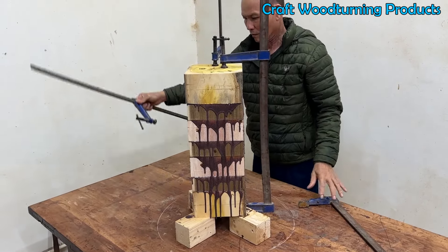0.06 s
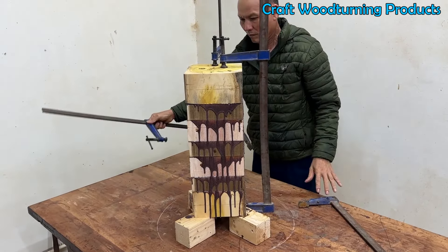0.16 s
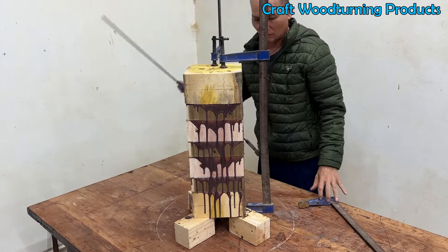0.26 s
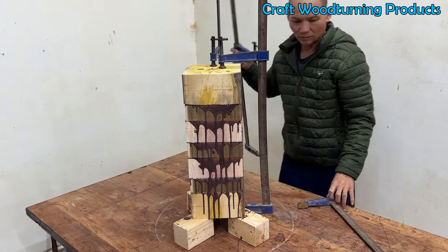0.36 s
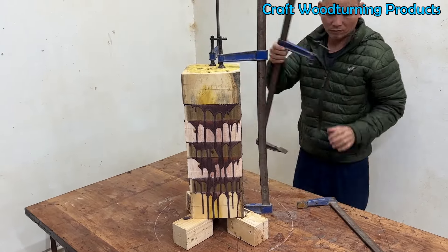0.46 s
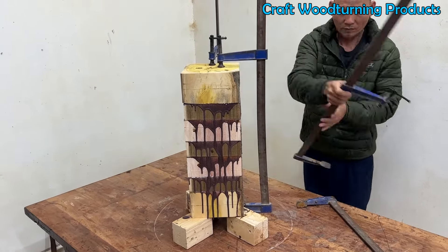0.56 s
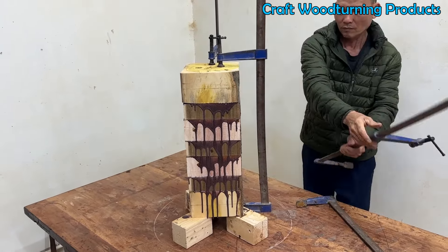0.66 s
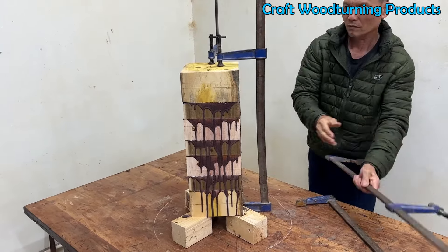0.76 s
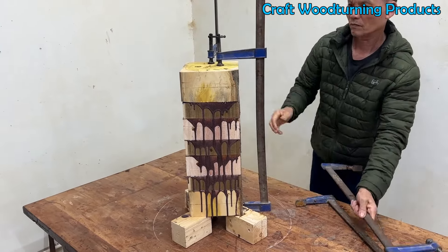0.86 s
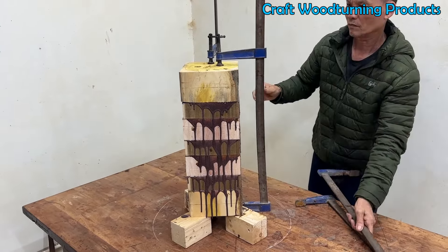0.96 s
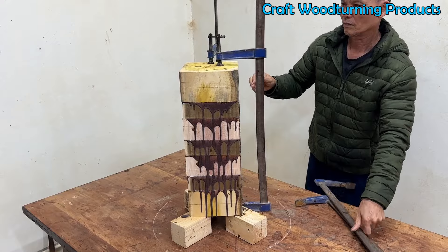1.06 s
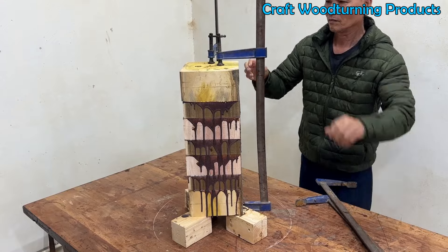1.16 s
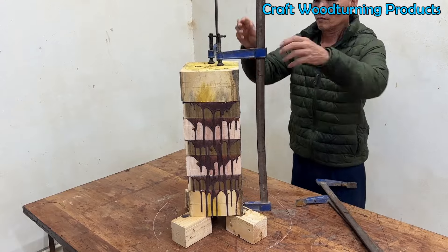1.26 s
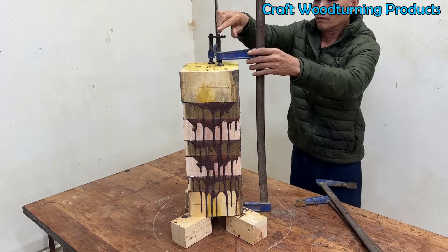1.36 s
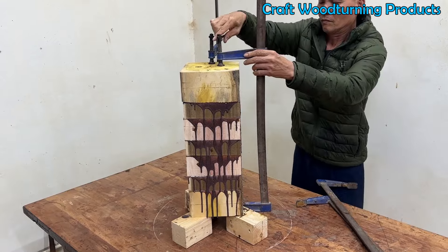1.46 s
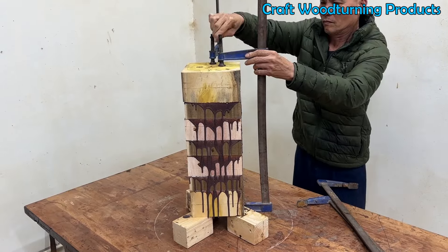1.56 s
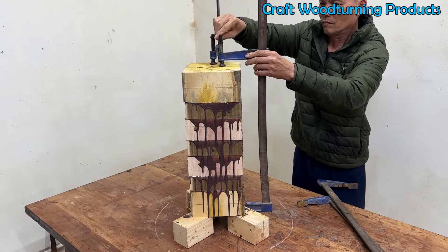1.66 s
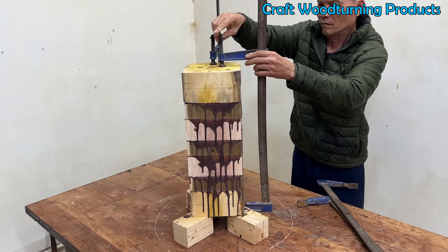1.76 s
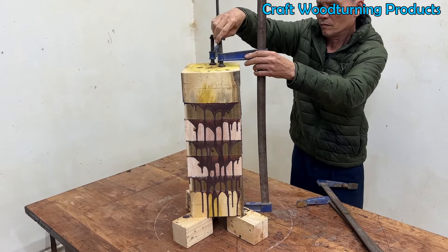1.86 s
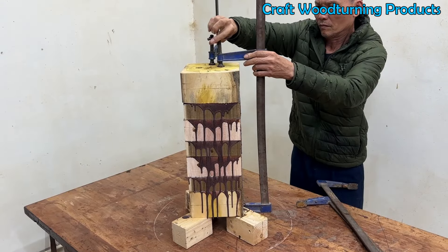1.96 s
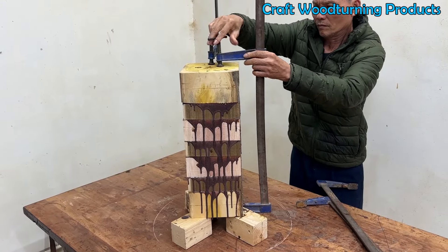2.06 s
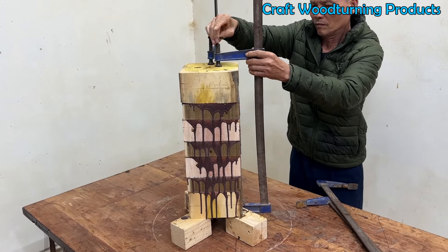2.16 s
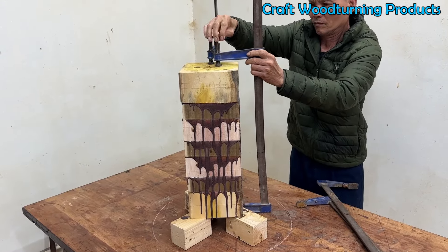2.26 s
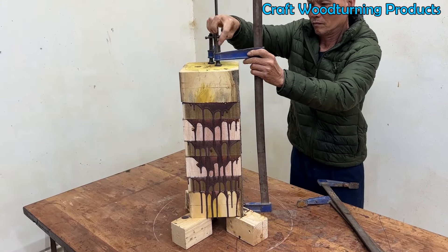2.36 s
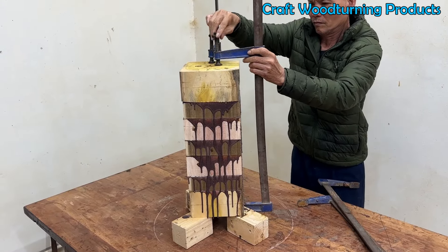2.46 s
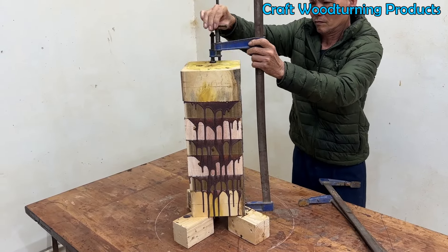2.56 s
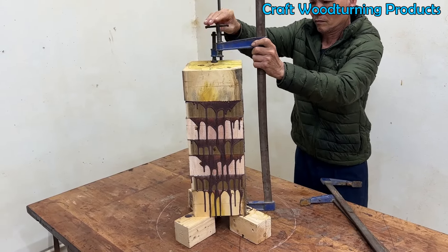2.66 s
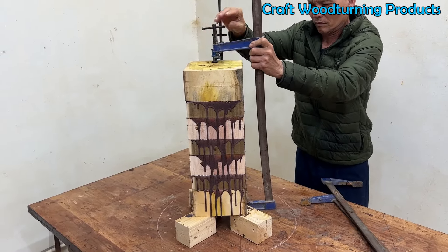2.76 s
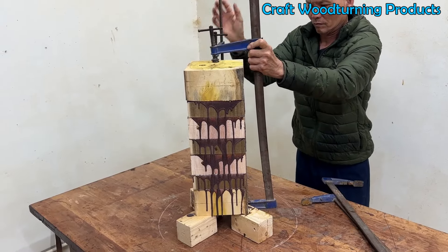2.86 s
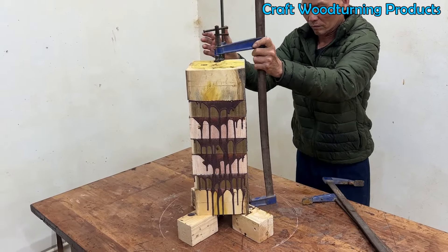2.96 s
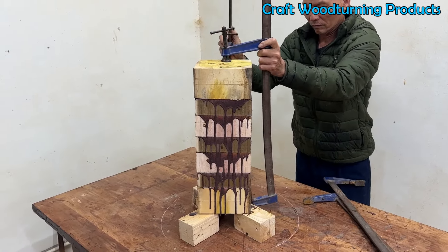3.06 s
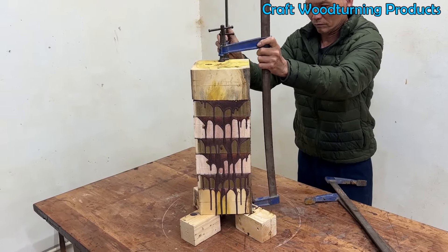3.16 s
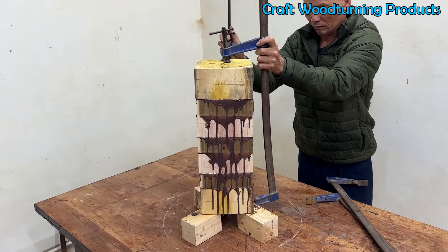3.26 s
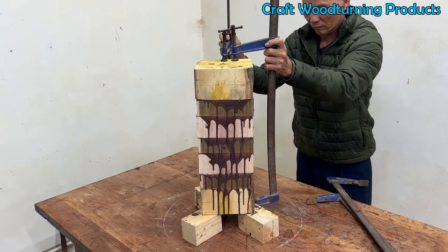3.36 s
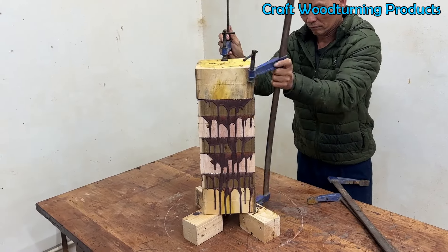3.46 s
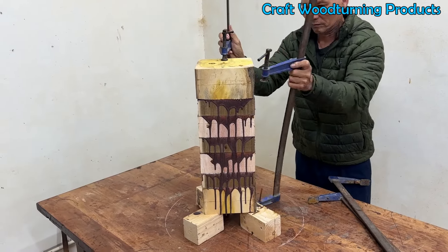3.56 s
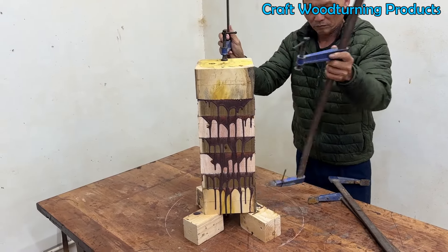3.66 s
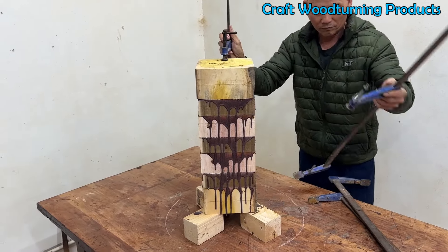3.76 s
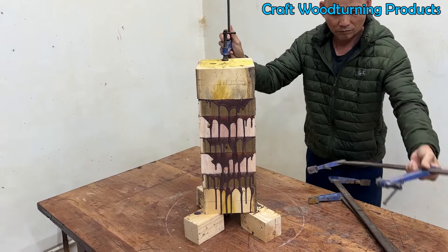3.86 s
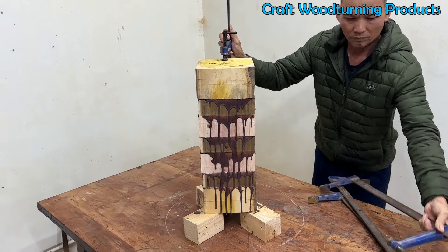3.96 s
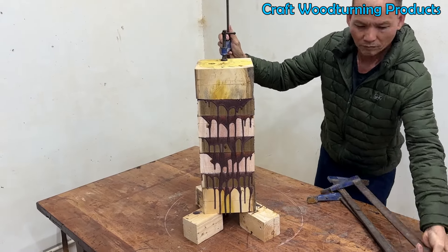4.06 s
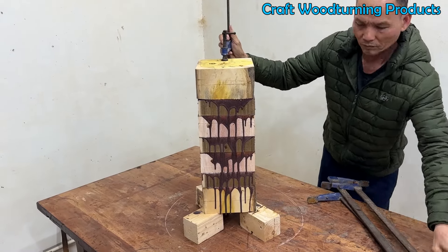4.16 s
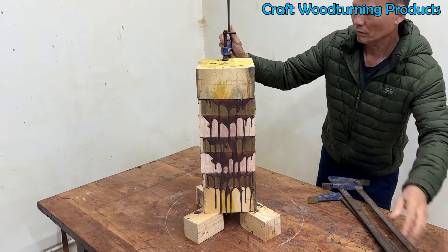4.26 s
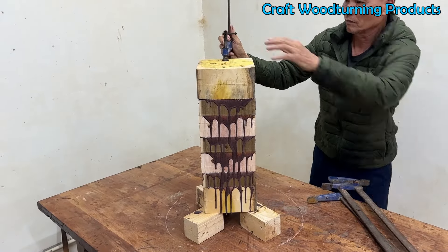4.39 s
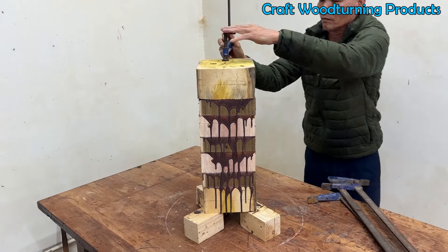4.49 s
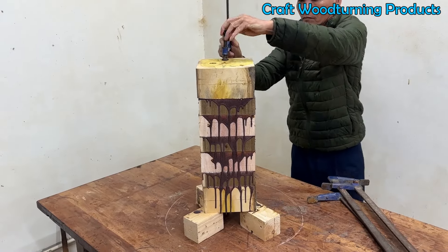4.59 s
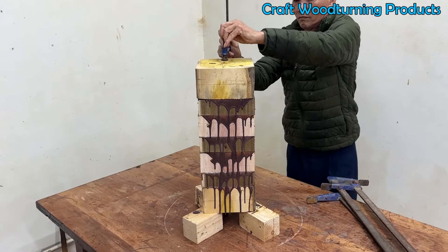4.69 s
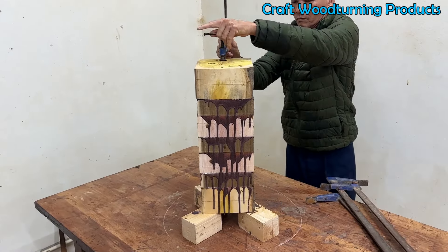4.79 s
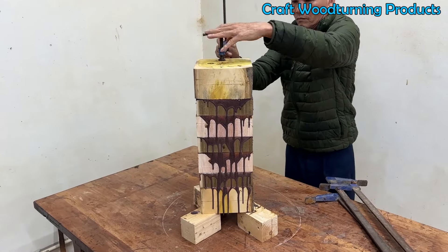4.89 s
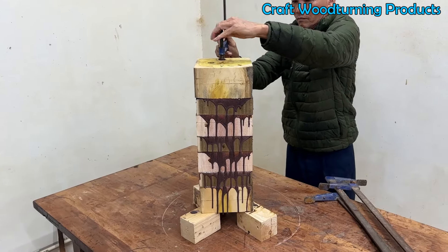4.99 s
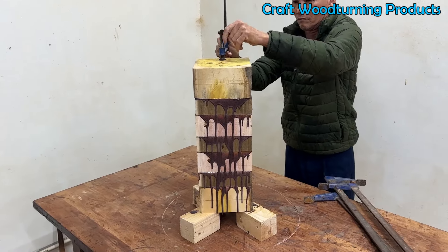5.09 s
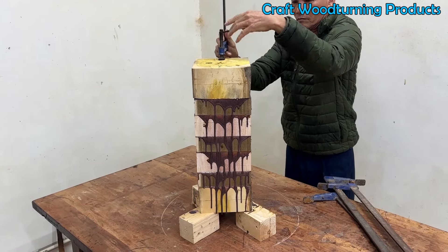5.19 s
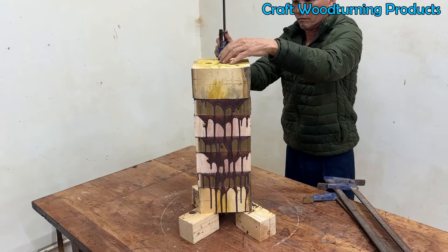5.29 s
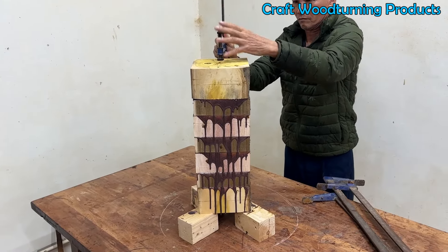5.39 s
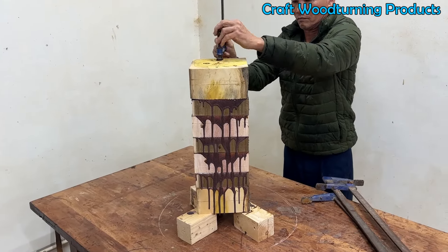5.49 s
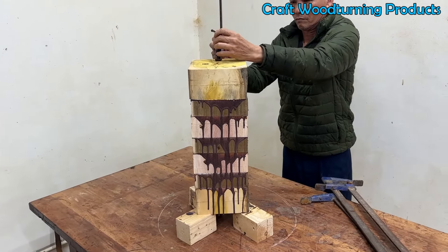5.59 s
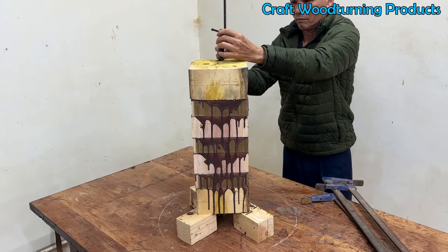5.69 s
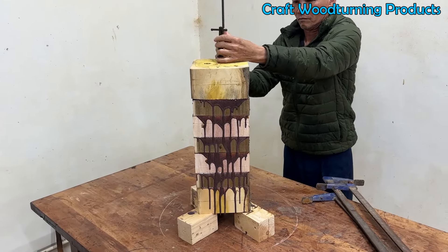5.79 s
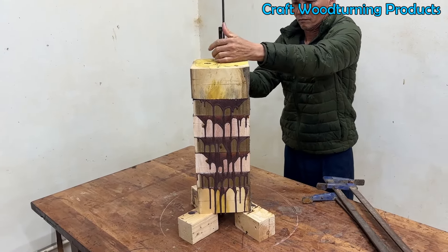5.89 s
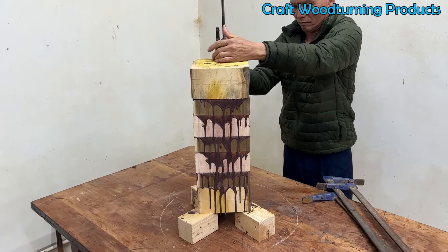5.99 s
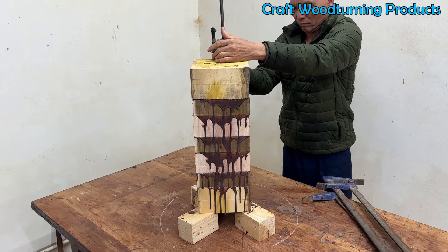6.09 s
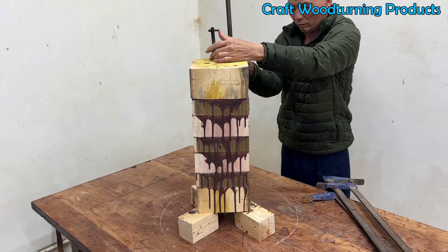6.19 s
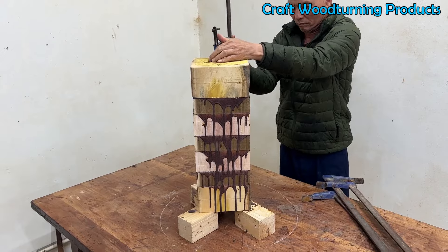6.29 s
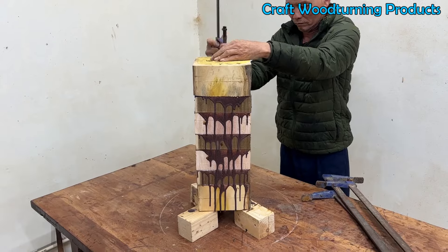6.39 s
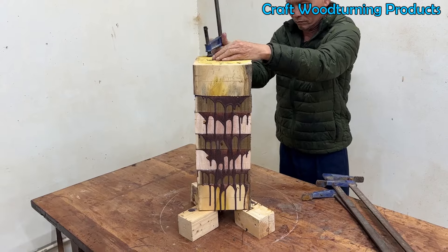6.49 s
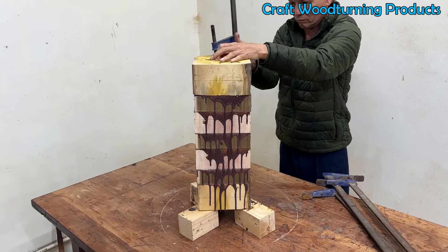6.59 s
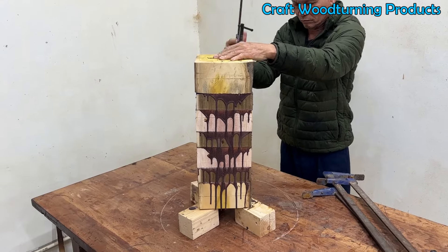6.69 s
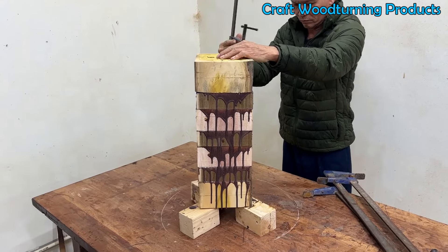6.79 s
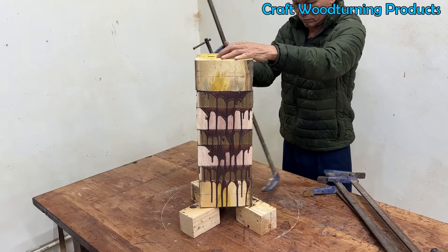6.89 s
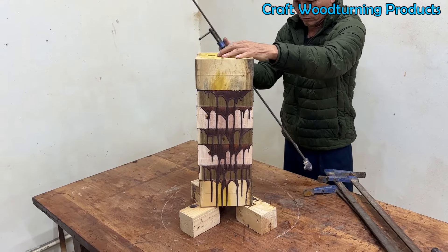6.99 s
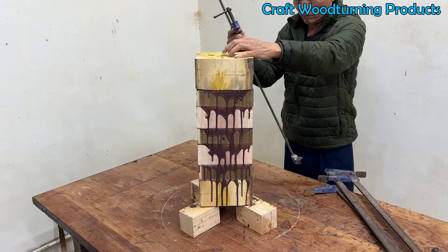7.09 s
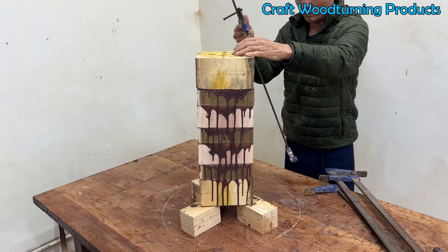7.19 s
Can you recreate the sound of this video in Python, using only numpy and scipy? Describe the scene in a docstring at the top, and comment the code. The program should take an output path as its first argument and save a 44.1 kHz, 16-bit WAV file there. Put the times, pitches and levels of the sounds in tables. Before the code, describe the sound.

Steel bar clamps tick as they are unscrewed, then clank and jingle down onto a wooden workbench, over a low hum.

```python
"""A bare workshop: steel bar clamps are unscrewed, knocked off a glued stack of wooden blocks, laid down.
Each contact is a burst of chatter plus decaying modes: the bar clanks, small steel parts jingle,
the wood knocks, the stack booms. The walls answer all but the boom.
Cloth and sliding steel rustle as grainy noise. Behind: a low hum and a small bird whistling outside."""
import sys
import numpy as np
from scipy import signal
from scipy.fft import rfft, irfft, next_fast_len
from scipy.io import wavfile
from scipy.ndimage import uniform_filter1d, map_coordinates

SR = 44100
rng = np.random.default_rng(int(sys.argv[2]) if len(sys.argv) > 2 else 0)


def digitize_waveform(pressure):
    """Quantize a signal to 16-bit integers and store it at the path in sys.argv[1].

    Rows of a 2-D input are taken as channels; values are limited to [-1, 1].
    """
    field = np.atleast_2d(pressure).T
    bounded = np.clip(field, -1, 1)
    quanta = np.round(bounded * 32767).astype(np.int16)
    wavfile.write(sys.argv[1], SR, quanta)


N = 319284

# room decay: freq_hz, t60_s
ROOM_DECAY = [(250, 0.53), (1000, 0.32), (3000, 0.32), (7000, 0.12), (14000, 0.28)]
# wall echo colour: freq_hz, gain_db
ECHO_COLOUR = [(450, -1), (1300, 0.5), (2300, -0.5), (7000, -1.5)]
# left-right likeness of echoes: freq_hz, correlation
ECHO_CORRELATION = [(200, 0.44), (400, 0.94), (700, .85), (2000, 0.38), (5000, 0.32), (14000, 0.14)]
# left-right likeness of hum and rustle: freq_hz, correlation
NOISE_CORRELATION = [(60, 0.9), (180, 0.98), (550, 0.77), (1650, 0.32), (4970, 0.056), (15000, 0.29)]
# left-right likeness of direct contact sound: freq_hz, correlation
DIRECT_CORRELATION = [(300, 0.97), (1000, 1), (2500, 0.91), (4000, 0.032), (14000, 0.031)]
# microphone balance: freq_hz, left_minus_right_db
MIC_BALANCE = [(60, -2.5), (180, 1.5), (550, 1.5), (1650, 1.5), (4970, -1.5), (15000, 0.5)]
# hum envelope: time_s, level_db
HUM_LEVEL = [(0, -59.5), (2, -58.5), (5, -58.5), (7.24, -61.5)]
# hum spectrum: freq_hz, relative_density_db
HUM_SPECTRUM = [(15, -77), (25, -42.5), (131, -2.5), (226, -0.5), (296, -9), (349, -8), (538, -8.5),
                (617, -11), (787, -12.5), (952, -11.5), (1930, -16.5), (2090, -25.5), (5570, -28),
                (14800, -30.5), (16500, -47)]
# bird whistles: start_s, length_s, start_hz, end_hz, level_db
BIRD_CALLS = [(1.95, 0.072, 7400, 7550, -67), (2.015, 0.079, 7240, 6500, -59),
              (2.45, 0.12, 7830, 7250, -70), (2.517, 0.064, 7450, 6620, -61),
              (3.279, 0.085, 7430, 6500, -57.5), (5.071, 0.073, 7140, 6030, -63.5),
              (5.517, 0.063, 7500, 6280, -66)]
# cloth and sliding steel spectrum: freq_hz, relative_density_db
RUSTLE_SPECTRUM = [(880, -44.5), (1500, 0.5), (2060, -7.5), (3690, -2), (7460, -3.5), (9560, -8),
                   (13000, -4), (16000, -6)]
# sleeve sweep envelope: time_s, level_db
SLEEVE_LEVEL = [(.33, -76), (.5, -71), (.55, -49.5), (.6, -50.5), (.62, -55), (.64, -49.5), (.69, -62),
                (.82, -57), (.89, -56), (.96, -69)]
# loose steel slides: start_s, hold_s, level_db
STEEL_SLIDES = [(1.202, 0.025, -39), (1.282, 0.18, -64), (2.68, 0, -54.5), (3.564, 0.044, -41),
                (3.757, 0.0082, -67), (4.089, 0.083, -45.5), (4.336, 0.043, -38.5), (5.981, 0, -53),
                (6.474, .05, -58.5), (6.756, 0.059, -60), (7.019, .02, -42)]
# stack on the bench: pitch_hz, relative_db, t60_s
STACK_MODES = [(258.1, -6.5, 0.44), (245, -25, .3), (220, -14.5, 0.29), (153, -26.5, 0.71),
               (324, -17.5, 0.29), (360.7, -16.5, 0.2), (30, -38.5, 0.24)]
# blocks and bench top: pitch_hz, relative_db, t60_s
WOOD_MODES = [(366, 3, 0.12), (462, 6, 0.082), (503, 3.5, 0.076), (586, -5.5, 0.053), (662, -12.5, .06),
              (830, -4.5, 0.018), (977, -8, 0.091), (1300, -6.5, .06)]
# screw, handle and jaw: pitch_hz, relative_db, t60_s
PART_MODES = [(5720, -5.5, 0.074), (7330, -5.5, 0.093), (8070, -6, 0.053), (9200, -3.5, 0.042),
              (10470, -3.5, 0.087), (11100, -1.5, 0.073), (12400, -7, .05), (13000, -5.5, 0.046),
              (13470, -6, .06), (14700, -3, .07), (15100, -3, .06)]
# clamp bar: pitch_hz, relative_db, t60_s
BAR_MODES = [(1460, -3, .06), (1770, -3, .05), (1980, -4, .05), (2180, -3, .05), (2420, -2, .06),
             (2610, -3, .05), (2880, -6, .05), (3170, -2, .05), (3690, -7, .05), (4300, -9, .04)]
# steel-on-steel spectrum: freq_hz, relative_density_db
CRACK_SPECTRUM = [(3000, -34), (5000, 5.5), (7000, 1), (10000, 2.5), (15000, 0), (17000, -10.5)]
# hand or padded jaw nudges the stack: start_s, boom_db, knock_db, knock_hz
STACK_NUDGES = [(.399, -55, -47.5, 513), (.412, -70, -53.5, 430), (.428, -68, -48, 450),
                (.455, -70, -54, 480), (2.671, -38.5, -46, 453), (3.096, -38.5, -42, 362),
                (3.105, -58, -41.5, 1020), (3.308, -36.5, -45.5, 358), (3.43, -45, -48.5, 364),
                (4.729, -49.5, -54, 440), (5.12, -52.5, -47, 417), (6.384, -38.5, -50, 460),
                (6.615, -49.5, -42, 368), (6.927, -28, -40, 480), (7.058, -37, -35, 466)]
# screw and handle tick: start_s, clank_db, boom_db, jingle_db, clank_hz, jingle_hz, rise_s
SCREW_TICKS = [(0.299, -63, -75, -54.5, 3400, 4700, 0.0043), (0.41, -83, -70, -80, 2420, 4730, .006),
               (.453, -58, -52, -75, 2450, 4730, 0.0099), (0.46, -69, -73, -79, 1700, 4730, .006),
               (.59, -50, -65, -80, 3720, 4610, .001), (.779, -57, -87, -49.5, 2880, 5300, 0.0031),
               (1.48, -54.5, -55, -54, 3030, 7100, 0.0065), (1.665, -53, -56.5, -50, 2570, 5100, 0.0033),
               (1.76, -61.5, -71, -62, 3250, 4960, 0.0042), (1.817, -56.5, -73, -57, 2400, 5760, 0.0066),
               (1.834, -53, -59.5, -58, 2290, 5800, 0.0031), (2.044, -57, -53, -67, 1536, 6530, 0.0052),
               (2.122, -55, -77, -71, 3400, 7140, 0.0037), (2.171, -47, -48, -54.5, 2400, 5660, 0.0035),
               (2.268, -50.5, -56, -58.5, 1490, 5150, 0.0026), (2.345, -45, -60, -55, 2100, 4970, 0.0023),
               (2.519, -51.5, -51, -54.5, 3330, 5440, 0.002), (2.654, -41.5, -40, -47, 3300, 5700, 0.011),
               (2.686, -29.5, -55, -38, 3280, 15000, 0.0013),
               (2.914, -53.5, -52.5, -77, 1450, 4600, 0.0028), (3.181, -45, -37, -35, 1820, 9600, 0.003),
               (3.478, -49, -38.5, -42.5, 2120, 9600, 0.01), (3.92, -54.5, -44.5, -54, 3300, 7100, 0.0029),
               (4.695, -45.5, -46, -43, 3330, 5100, 0.002), (4.8, -63.5, -78, -58, 1980, 7550, 0.0084),
               (5.029, -54, -67, -79.5, 1840, 11400, 0.0022),
               (5.251, -49.5, -43.5, -75.5, 1790, 6080, 0.0044),
               (5.487, -54, -51.5, -72.5, 1860, 10640, 0.003),
               (5.601, -48.5, -43.5, -57, 2420, 6570, 0.0025), (5.617, -47.5, -64, -56, 1810, 6600, 0.0019),
               (5.669, -47.5, -59, -46.5, 1510, 11800, 0.0059), (5.752, -50, -48, -62, 1900, 5100, 0.0033),
               (5.767, -53, -63, -62, 1800, 7000, 0.0017), (5.862, -53, -81, -65, 3420, 7200, 0.0026),
               (5.876, -45, -77, -59, 1820, 7140, 0.0023), (5.922, -44, -65, -50.5, 1920, 10400, 0.002),
               (5.944, -41.5, -53, -37, 2200, 13300, 0.0039), (5.947, -39, -50, -49, 3600, 4960, 0.0028),
               (5.952, -40, -52, -47.5, 2900, 13150, 0.0053),
               (6.019, -49, -77.5, -48.5, 2000, 15800, .0022), (6.027, -50, -53, -65, 2790, 9000, .004),
               (5.879, -52, -73, -65, 2650, 7060, 0.0019), (6.284, -57.5, -61.5, -69, 2220, 6030, 0.0032),
               (6.442, -47, -62, -48.5, 2610, 13400, 0.001), (6.463, -52.5, -64, -47.5, 1510, 9500, 0.0035),
               (6.522, -54, -63, -75, 2680, 7260, 0.0014), (6.73, -46, -49.5, -49, 2620, 6900, 0.0027),
               (6.757, -47, -68, -49.5, 2540, 10080, 0.0062), (6.829, -43, -51, -33.5, 2570, 15200, .0027),
               (6.868, -44, -57, -60, 1450, 15200, 0.0017)]
# clamp strikes bench or stack:
# start_s, clank_db, boom_db, knock_db, jingle_db, knock_hz, clank_hz, jingle_hz, rise_s
CLAMP_BLOWS = [(1.001, -21, -56, -31.5, -36, 817, 3156, 6400, 0.004),
               (1.021, -21.5, -37, -37, -32.5, 880, 3204, 6040, .004),
               (1.04, -12.5, -31, -15.5, -17, 482, 2200, 8970, 0.003),
               (1.109, -14.5, -42, -19.5, -16.5, 386, 2273, 9470, 0.0028),
               (1.13, -21.5, -51, -24.5, -15, 700, 3180, 12950, .004),
               (1.172, -24.5, -60.5, -22, -26, 384, 2230, 10100, 0.0082),
               (1.194, -13.5, -19, -18.5, -15, 850, 1923, 13950, .0038),
               (1.213, -26.5, -50, -21, -27.5, 427, 1840, 15100, 0.0074),
               (3.114, -35, -29, -34.5, -62.5, 1053, 1715, 15030, .0017),
               (3.383, -43, -52.5, -42.5, -47, 388, 1572, 10930, 0.0021),
               (3.51, -26.5, -35, -33, -13, 1090, 1787, 14360, 0.0016),
               (3.551, -11, -6.5, -11.5, -10.5, 514, 2286, 14760, 0.00097),
               (3.617, -43, -51.5, -27, -44.5, 533, 2060, 12000, 0.0057),
               (4.095, -16.5, -37, -18, -18, 600, 1840, 14630, 0.0036),
               (4.136, -32, -52.5, -35, -38, 616, 1500, 13680, 0.0033),
               (4.158, -53, -49, -41, -52.5, 850, 1480, 11780, 0.0019),
               (4.187, -31.5, -58, -40, -48, 863, 1800, 5000, .008),
               (4.233, -26.5, -56, -34.5, -29.5, 560, 1700, 15000, 0.0072),
               (4.261, -30, -36, -23.5, -30, 830, 1750, 11100, 0.0026),
               (4.282, -23, -44, -28, -14, 480, 2190, 14500, 0.0041),
               (4.292, -17.5, -29.5, -22.5, -17.5, 800, 2405, 11210, 0.0078),
               (4.322, -28.5, -36.5, -26.5, -33, 560, 2413, 10340, 0.0031),
               (4.333, -22, -19, -25.5, -36, 790, 1470, 10240, .0025),
               (4.38, -29, -32, -20, -25.5, 386, 2040, 13820, .004),
               (4.442, -35.5, -60, -28.5, -44.5, 500, 2280, 14270, 0.0016),
               (4.465, -32, -44, -28.5, -34.5, 390, 2340, 9260, 0.0044),
               (6.557, -38.5, -33, -43.5, -42, 650, 1820, 8430, .0016),
               (6.954, -27, -15.5, -21.5, -41, 475, 1640, 15200, 0.0044),
               (7.008, -35, -47, -44, -24, 400, 4250, 11100, .004),
               (7.034, -33.5, -22, -44.5, -30, 477, 4530, 13410, .0053)]

HOLLOW_HZ, HOLLOW_WIDTH_HZ, HOLLOW_DB, HOLLOW_SWING_DB = 763, 250, -71.5, 4
SLIDE_RISE_DB_PER_S, SLIDE_FALL_DB_PER_S, CLOTH_FLOOR_DB = 397, 157, -75
NUDGE_CLANK_HZ, NUDGE_JINGLE_HZ, NUDGE_RISE_S = 1717, 9000, 0.0047
NUDGE_CLANK_DB, NUDGE_JINGLE_DB = -24.5, -18  # relative to the knock
TICK_KNOCK_HZ, TICK_KNOCK_DB = 1000, -15  # level relative to the clank
TICK_RING_DB, BLOW_RING_DB, DIFFUSE_RING_DB = 8, 4, -12  # weight of modes against chatter
ROOM_DB, ROOM_DELAY_S = -2, .004
BAR_TOP_HZ, BAND_LIMIT_HZ = 3830, 15880


def amp(db):
    """Decibels to gain."""
    return 10 ** (np.asarray(db) / 20)


def unit_rms(x):
    """Scale to rms 1."""
    return x / np.sqrt(np.mean(x ** 2) + 1e-20)


def at_hz(table, hz):
    """Interpolate on a log frequency axis."""
    freq_hz, values = np.transpose(table)
    return np.interp(np.log(hz + 1), np.log(freq_hz + 1), values)


def envelope(table):
    """Interpolate to one value per sample."""
    time_s, values = np.transpose(table)
    return np.interp(np.arange(N) / SR, time_s, values)


def wobble(rate_hz):
    """Smooth curve through random knots."""
    knots = rng.standard_normal(int(N * rate_hz / SR) + 4)
    return map_coordinates(knots, [np.arange(N) * rate_hz / SR])


def resonance(hz, centre_hz, width_hz):
    """Two-pole band-pass response."""
    return 1j * hz * width_hz / (centre_hz ** 2 - hz ** 2 + 1j * hz * width_hz)


def filtered(x, response):
    """Apply a frequency response by FFT."""
    n = x.shape[-1]
    size = next_fast_len(n + 4096)
    return irfft(rfft(x, size) * response(np.fft.rfftfreq(size, 1 / SR)), size)[..., :n]


def stereo(a, b, correlation):
    """Mix two unrelated signals as mid and side for a given left-right correlation."""
    angle = lambda hz: np.arccos(np.clip(at_hz(correlation, hz), -1, 1)) / 2
    mid = filtered(a, lambda hz: np.cos(angle(hz)))
    side = filtered(b, lambda hz: np.sin(angle(hz)))
    return np.array([mid + side, mid - side])


def patchy_noise(spectrum, patch_db):
    """Stereo noise, rms 1, its gain uneven over time and frequency."""
    bins = signal.stft(rng.standard_normal((2, N)), nperseg=512)[2]
    patches = uniform_filter1d(uniform_filter1d(rng.standard_normal(bins.shape[1:]), 5, 0), 10, 1)
    pair = signal.istft(bins * amp(patch_db * unit_rms(patches)), nperseg=512)[1][:, :N]
    coloured = filtered(pair, lambda hz: amp(at_hz(spectrum, hz)))
    return unit_rms(stereo(*coloured, NOISE_CORRELATION))


def room_responses(count):
    """Stereo wall echoes: noise tails, each frequency decaying at its own rate."""
    hz, t, bins = signal.stft(rng.standard_normal((2, count, SR // 2)), SR, nperseg=256)
    decay = amp(-60 * t / at_hz(ROOM_DECAY, hz)[:, None])
    tails = stereo(*signal.istft(bins * decay, SR, nperseg=256)[1], ECHO_CORRELATION)
    mean_energy = np.sum(tails ** 2) / (2 * count)
    return filtered(tails, lambda hz: amp(at_hz(ECHO_COLOUR, hz))) / np.sqrt(mean_energy)


def workshop_hum():
    """Distant machines and traffic: low patchy noise; a hollow note comes and goes."""
    waver_db = .8 * wobble(rate_hz=5)
    hollow = filtered(rng.standard_normal(N), lambda hz: resonance(hz, HOLLOW_HZ, HOLLOW_WIDTH_HZ) ** 2)
    hum = amp(envelope(HUM_LEVEL) + waver_db) * patchy_noise(HUM_SPECTRUM, patch_db=2.5)
    return hum + amp(HOLLOW_DB + HOLLOW_SWING_DB * wobble(rate_hz=9)) * unit_rms(hollow)


def bird():
    """Thin, husky whistles, mostly falling, blurred by echoes."""
    calls = np.zeros(N)
    husk_hz = 250 * wobble(rate_hz=410)
    for start_s, length_s, start_hz, end_hz, level_db in BIRD_CALLS:
        start, n = round(start_s * SR), round(length_s * SR)
        progress = np.linspace(0, 1, n)
        pitch_hz = start_hz + (end_hz - start_hz) * progress + husk_hz[start:][:n]
        whistle = np.sin(2 * np.pi * np.cumsum(pitch_hz) / SR)
        calls[start:][:n] += amp(level_db) * np.sin(np.pi * progress) * whistle
    return signal.fftconvolve(calls[None], room_responses(1)[:, 0], axes=1)[:, :N]


def rustle():
    """Jacket cloth and sliding steel: noise broken into fine uneven grains."""
    t = np.arange(N) / SR
    sweeping = (t > SLEEVE_LEVEL[0][0]) & (t < SLEEVE_LEVEL[-1][0])
    power = amp(CLOTH_FLOOR_DB) ** 2 + amp(envelope(SLEEVE_LEVEL)) ** 2 * sweeping
    for start_s, hold_s, level_db in STEEL_SLIDES:
        before_db = SLIDE_RISE_DB_PER_S * np.maximum(start_s - t, 0)
        after_db = SLIDE_FALL_DB_PER_S * np.maximum(t - start_s - hold_s, 0)
        power += amp(level_db - before_db - after_db) ** 2
    grain = amp(2 * wobble(rate_hz=40) + 2 * wobble(rate_hz=300))
    return np.sqrt(power) * unit_rms(grain * patchy_noise(RUSTLE_SPECTRUM, patch_db=0.5))


def ring(modes, t, rise_s, favoured_hz):
    """Decaying modes at random strengths; the spot struck favours those near one pitch."""
    hz, db, t60_s = np.transpose(modes)[..., None]
    gain = amp(db + 2.5 * rng.standard_normal(db.shape))
    gain *= .2 + np.abs(resonance(hz, favoured_hz, .12 * favoured_hz))
    sign = (-1) ** np.arange(len(modes))[:, None]
    waves = sign * gain * amp(-60 * t / t60_s) * np.sin(2 * np.pi * hz * t)
    onset = 1 - np.exp(-(t / rise_s) ** 2)
    return waves.sum(0) * onset / np.linalg.norm(gain)


def impact(t, clank_db, knock_db, jingle_db, knock_hz, clank_hz, jingle_hz, rise_s, ring_db):
    """Jaws chatter and drive bar, small parts and wood: each a filtered burst plus its modes."""
    burst = t / rise_s * np.exp(1 - t / rise_s)
    burst += 0.35 * (1 - np.exp(-t / rise_s)) * np.exp(-t / .009)
    chatter = burst * rng.standard_normal((3, len(t)))
    at_burst_energy = lambda x: x / np.sqrt(np.sum(x ** 2) / np.sum(burst ** 2))
    steel_ring = amp(ring_db)
    wood_ring = min(steel_ring, 1)
    top_hz = max(BAR_TOP_HZ, clank_hz)

    def bar(hz):
        struck = steel_ring * resonance(hz, clank_hz, 180) + .45
        lowpass = 1 / (1 - (hz / top_hz) ** 2 + 1.2j * hz / top_hz)
        return struck * resonance(hz, clank_hz, 1.92 * clank_hz) ** 2 * lowpass

    def parts(hz):
        broad = 2.1 * resonance(hz, jingle_hz, 0.86 * jingle_hz)
        narrow = 1.5 * steel_ring * resonance(hz, jingle_hz, 300)
        return amp(at_hz(CRACK_SPECTRUM, hz)) * (0.081 + broad + narrow)

    def wood(hz):
        return (wood_ring * resonance(hz, knock_hz, 120) + 0.26) * resonance(hz, 678, 1300) ** 2

    scrape = at_burst_energy(filtered(chatter[0], bar))
    crack = at_burst_energy(filtered(chatter[1], parts))
    thud = at_burst_energy(filtered(chatter[2], wood))
    clank = 0.56 * scrape + .5 * steel_ring * ring(BAR_MODES, t, rise_s, clank_hz)
    jingle = 0.64 * crack + 0.47 * steel_ring * ring(PART_MODES, t, rise_s, jingle_hz)
    knock = 0.68 * thud + wood_ring * ring(WOOD_MODES, t, rise_s, knock_hz)
    return amp(clank_db) * clank + amp(jingle_db) * jingle + amp(knock_db) * knock


def contacts():
    """Blows, ticks and nudges as start_s, boom_db, ring_db, impact settings."""
    for start_s, clank_db, boom_db, *rest in CLAMP_BLOWS:
        yield start_s, boom_db, BLOW_RING_DB, (clank_db, *rest)
    for start_s, clank_db, boom_db, jingle_db, clank_hz, jingle_hz, rise_s in SCREW_TICKS:
        levels_db = clank_db, clank_db + TICK_KNOCK_DB, jingle_db
        pitches_hz = TICK_KNOCK_HZ, clank_hz, jingle_hz
        yield start_s, boom_db, TICK_RING_DB, (*levels_db, *pitches_hz, rise_s)
    for start_s, boom_db, knock_db, knock_hz in STACK_NUDGES:
        levels_db = knock_db + NUDGE_CLANK_DB, knock_db, knock_db + NUDGE_JINGLE_DB
        pitches_hz = knock_hz, NUDGE_CLANK_HZ, NUDGE_JINGLE_HZ
        yield start_s, boom_db, BLOW_RING_DB, (*levels_db, *pitches_hz, NUDGE_RISE_S)


def clamps():
    """Each contact: direct impact, wall echo, and the heavy stack swinging up into a boom."""
    mid, side, room = np.zeros(N + SR), np.zeros(N + SR), np.zeros((2, N + 2 * SR))
    boom_t, t = np.arange(SR // 2) / SR, np.arange(SR // 8) / SR
    events = list(contacts())
    tails = room_responses(len(events))
    for k, (start_s, boom_db, ring_db, settings) in enumerate(events):
        start = round(start_s * SR)
        mid[start:][:len(t)] += impact(t, *settings, ring_db)
        boom = ring(STACK_MODES, boom_t, rise_s=0.0085, favoured_hz=STACK_MODES[0][0])
        mid[start:][:len(boom)] += amp(boom_db) * boom
        # the long bar sends each side its own treble
        side[start:][:len(t)] += impact(t, *settings, ring_db)
        diffuse = impact(t, *settings, DIFFUSE_RING_DB)  # from all sides, no mode stands out
        echo = signal.fftconvolve(amp(ROOM_DB) * diffuse[None], tails[:, k], axes=1)
        room[:, round((start_s + ROOM_DELAY_S) * SR):][:, :echo.shape[1]] += echo
    return stereo(mid[:N], side[:N], DIRECT_CORRELATION) + room[:, :N]


def scene():
    """Stereo sum of all sources."""
    return clamps() + rustle() + workshop_hum() + bird()


def record(dry):
    """Microphone pair: balance by frequency, soft clip, band limit."""
    split = np.array([[.5], [-.5]])
    balanced = filtered(dry, lambda hz: amp(at_hz(MIC_BALANCE, hz) * split))
    clipped = balanced / (1 + np.abs(balanced / .9) ** 6) ** (1 / 6)
    return filtered(clipped, lambda hz: hz < BAND_LIMIT_HZ)


dry = scene()
out = record(dry)
digitize_waveform(out)
```